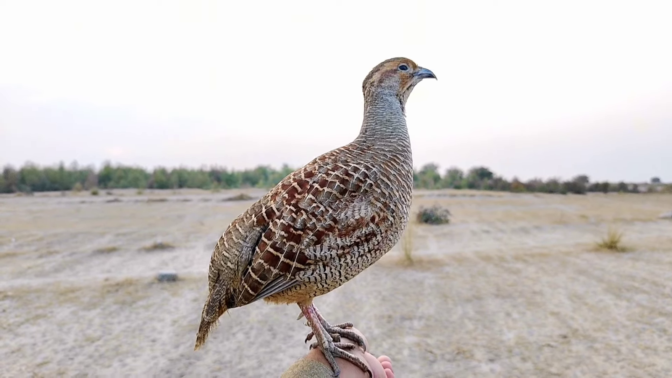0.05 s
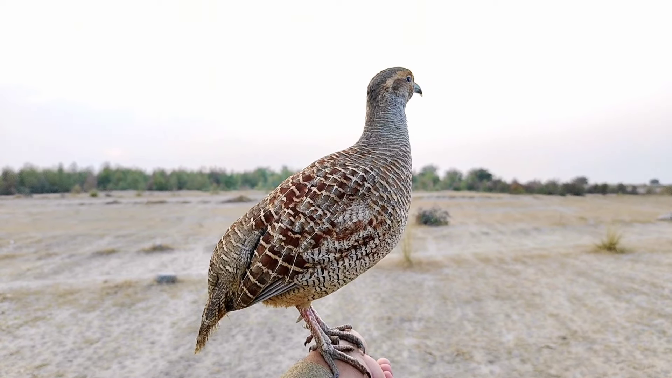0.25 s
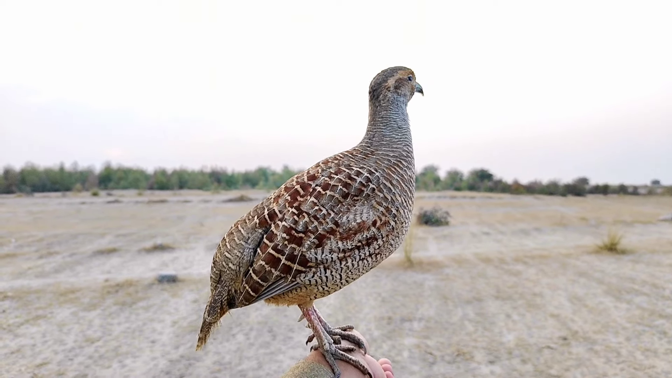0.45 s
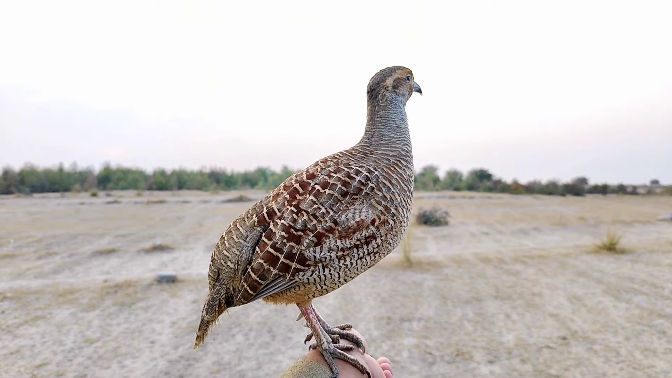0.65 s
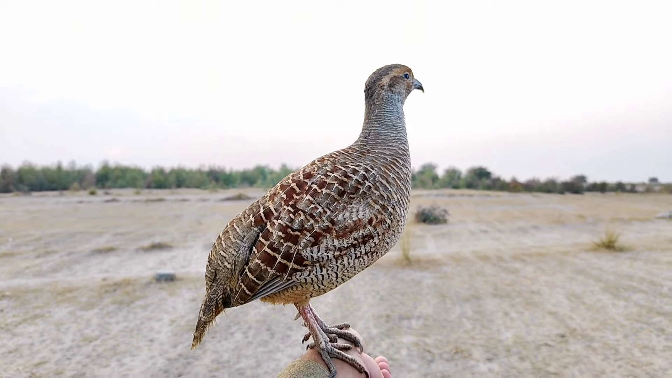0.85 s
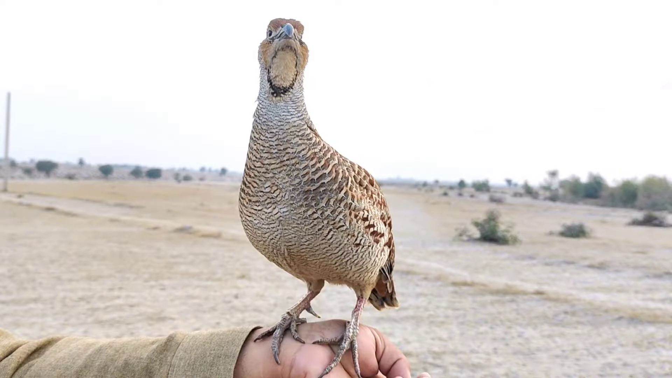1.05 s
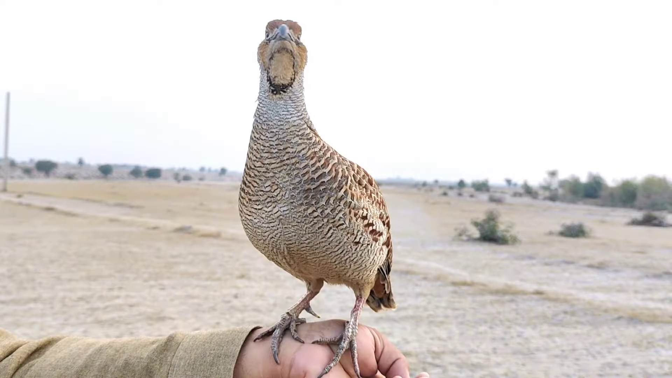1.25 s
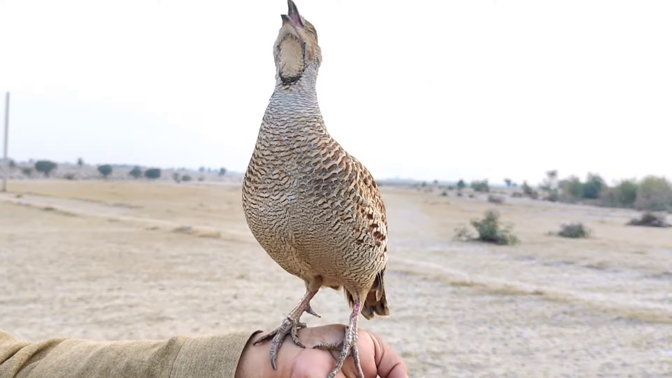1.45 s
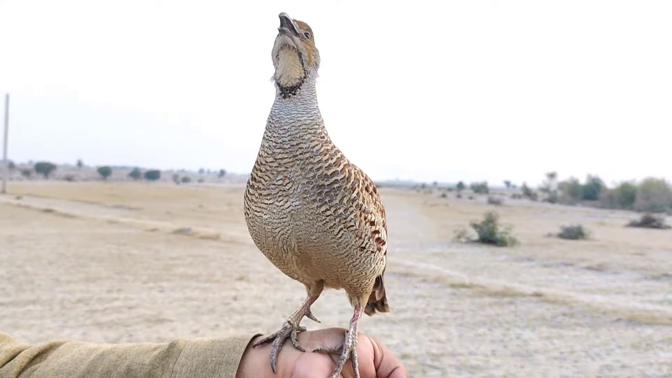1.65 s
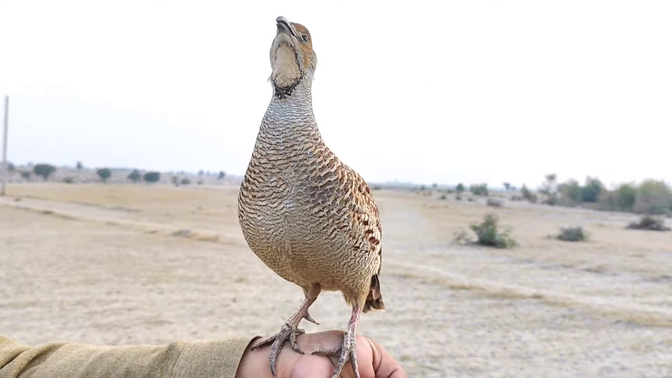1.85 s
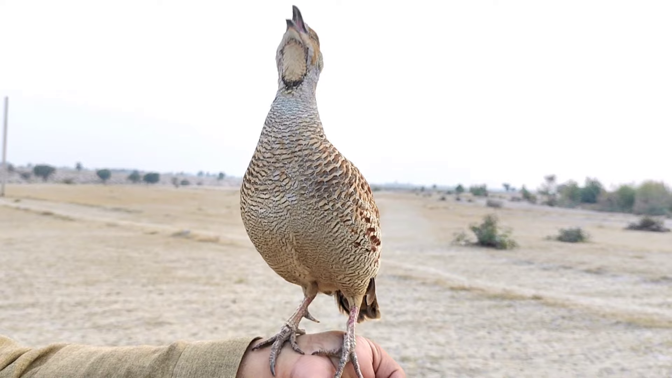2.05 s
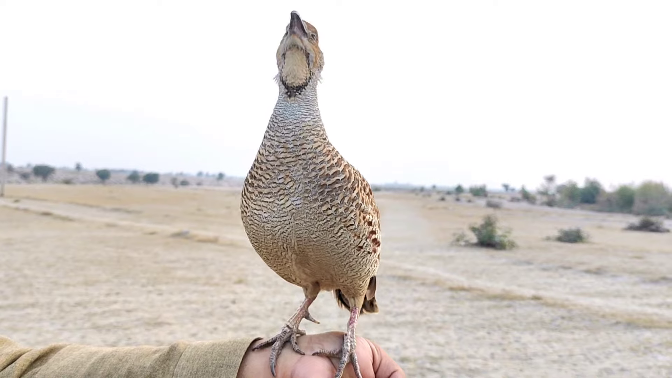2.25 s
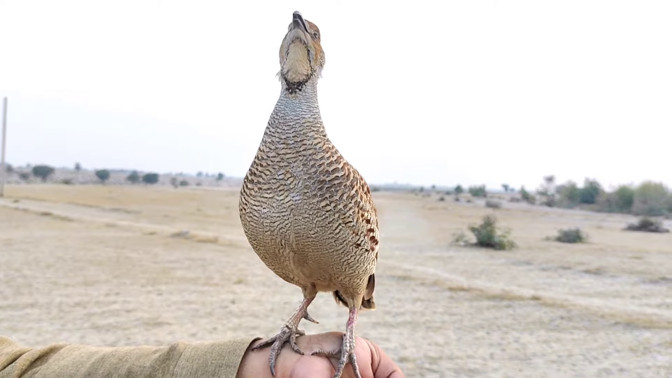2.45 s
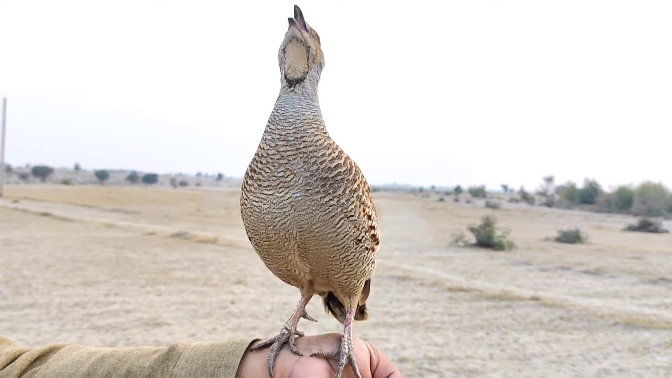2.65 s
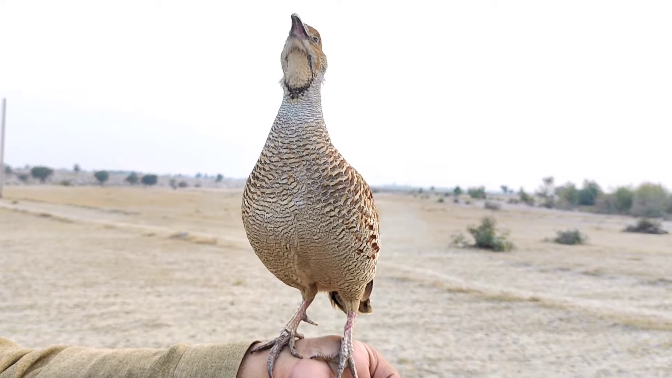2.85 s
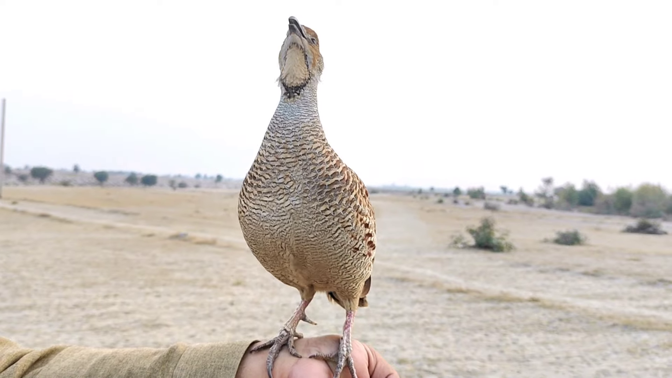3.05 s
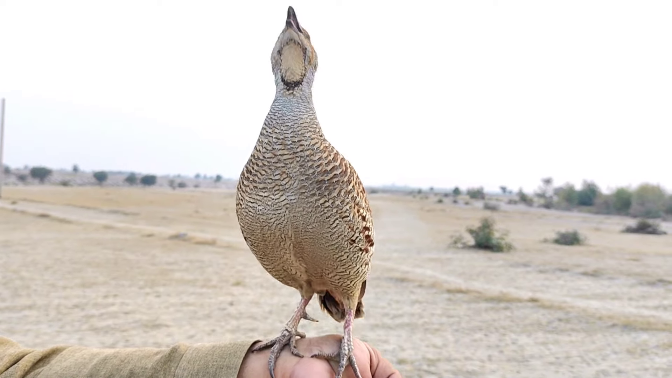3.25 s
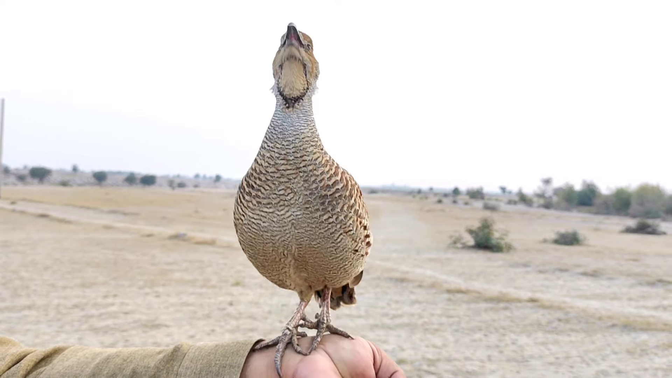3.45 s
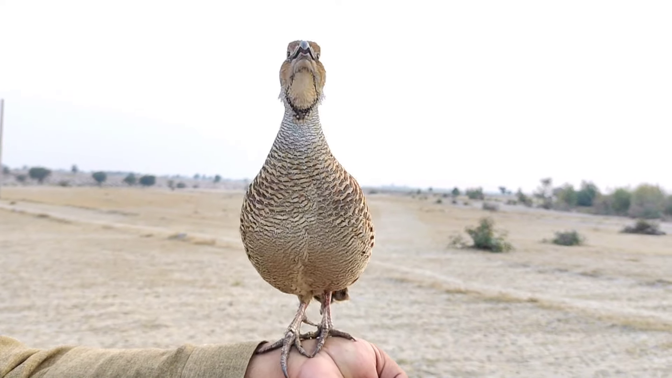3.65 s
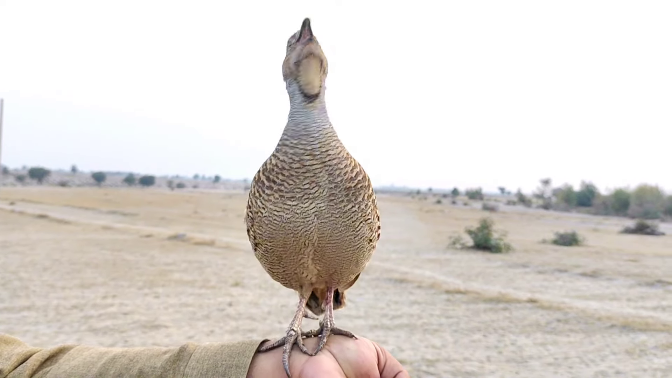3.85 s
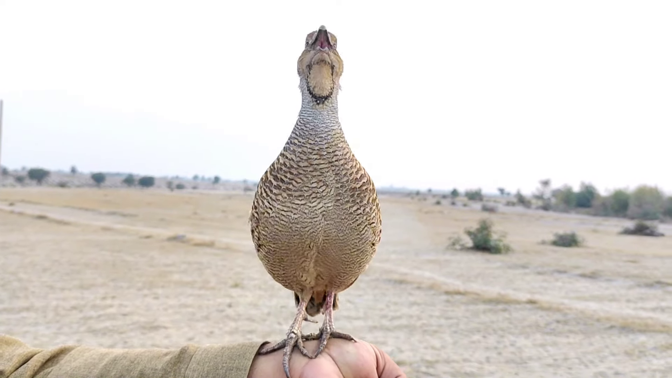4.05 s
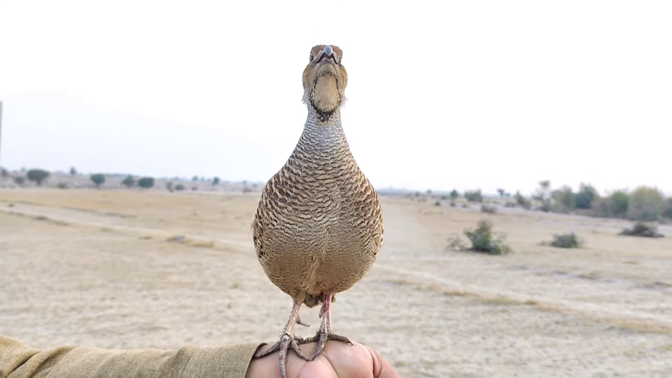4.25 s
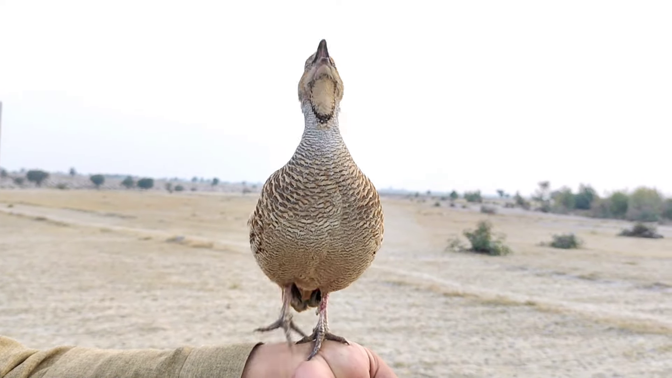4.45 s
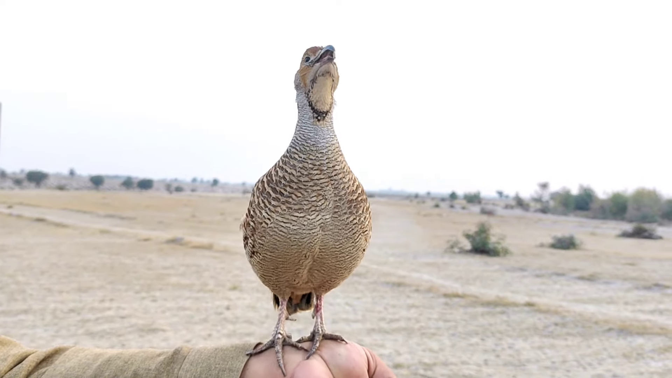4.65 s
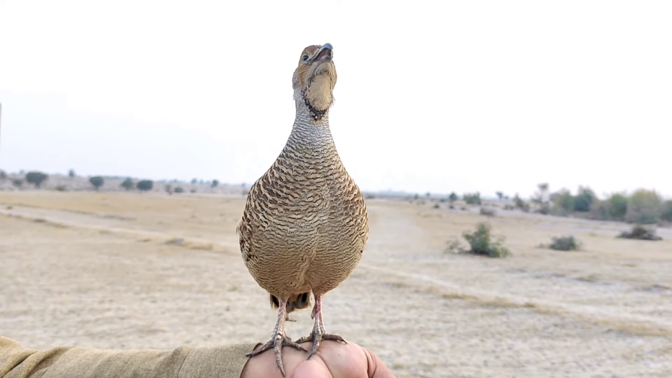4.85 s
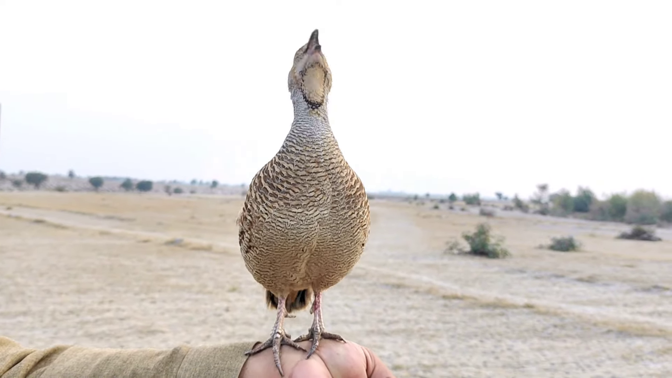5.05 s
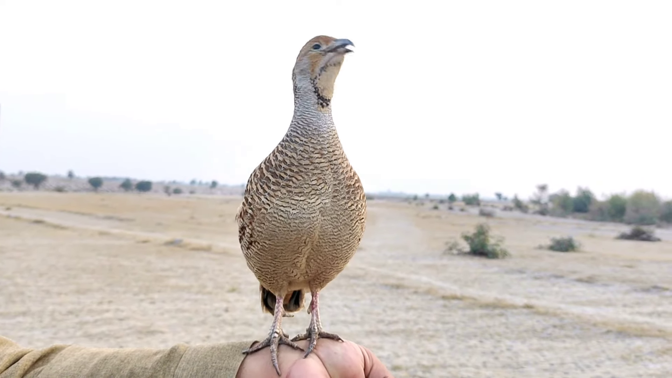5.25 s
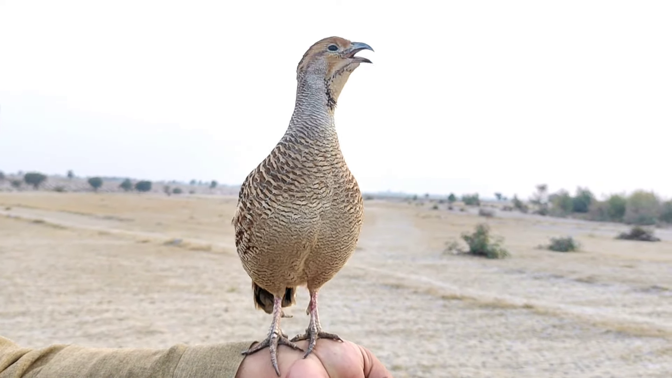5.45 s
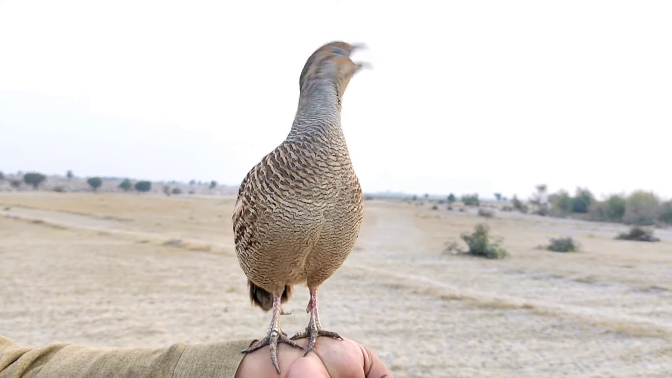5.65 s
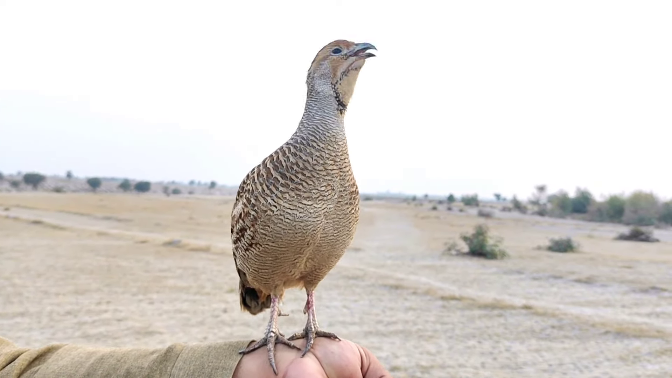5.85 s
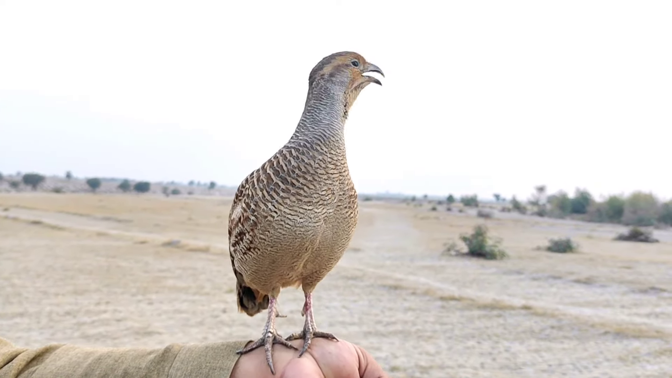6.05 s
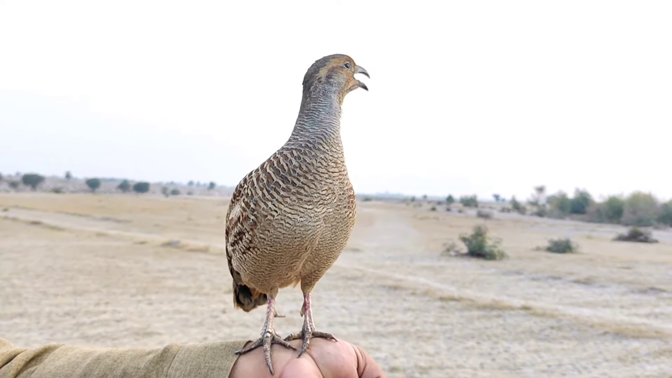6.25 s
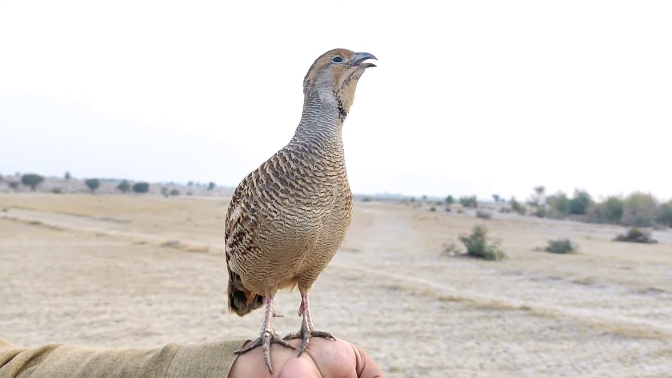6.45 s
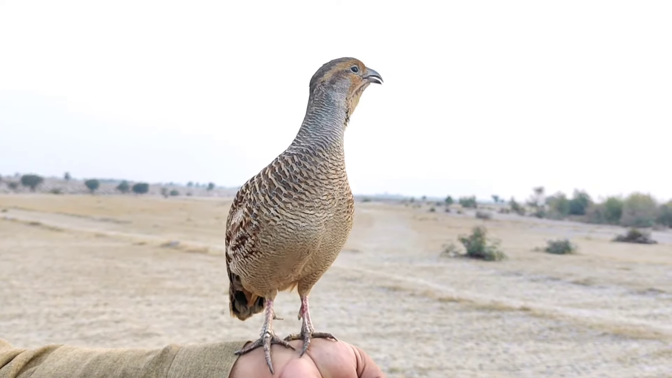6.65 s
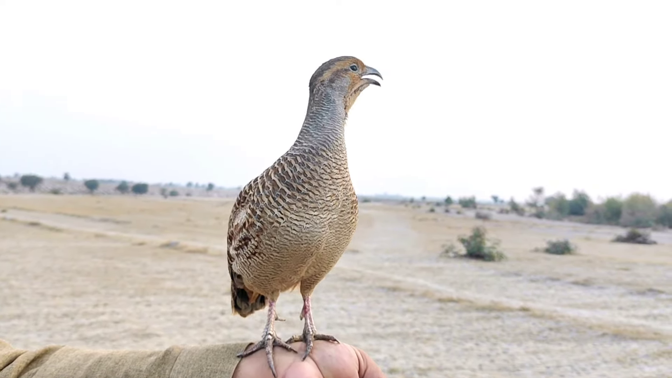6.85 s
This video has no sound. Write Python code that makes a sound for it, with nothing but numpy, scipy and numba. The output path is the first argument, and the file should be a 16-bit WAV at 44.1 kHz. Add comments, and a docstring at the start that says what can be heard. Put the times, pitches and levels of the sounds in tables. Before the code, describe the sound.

A faint, low breeze runs throughout in open fields. Close to the microphone, a francolin gives three soft, sliding chirps at about 0.1, 0.5 and 0.9 seconds. At 1.2 seconds it starts calling loudly with a thin, high, rising whistle, a tiny croak and a shrill piping phrase. From 1.7 seconds the call repeats about every 0.6 seconds with short pauses: two raspy clucks, the rising whistle, then a quick phrase flipping between clean notes and rasps. From about 5.5 seconds a harsh croak replaces the second cluck. The last bout begins at 6.6 seconds and reaches its whistle near 6.9 seconds. A hand makes a few soft, dull bumps on the microphone between 1.1 and 4.5 seconds, well below the calls. The bird sounds close and fairly dry, with only a very faint echo from distant hedges.

```python
"""Flat open fields in a low breeze, with a francolin perched on a hand close to a phone's two microphones.
After a few soft chirps it calls again and again: two clucks, a thin whistle, a piping phrase.
Its voice flips between clean notes, where the membranes swing regularly, and rasps, where they slap shut
and the pulses ring the throat. The hand bumps the phone now and then; far hedges echo the bird."""
import sys
import numpy as np
from scipy import signal
from scipy.fft import rfft, irfft, next_fast_len
from scipy.io import wavfile
from scipy.ndimage import uniform_filter1d, minimum_filter1d
from numba import njit

SR = 44100
rng = np.random.default_rng(int(sys.argv[2]) if len(sys.argv) > 2 else 0)


def pcm_store(signal):
    """Save signal as 16-bit PCM."""
    levels = np.round(np.clip(np.atleast_2d(signal), -1, 1) * 32767)
    wavfile.write(sys.argv[1], SR, levels.astype(np.int16).T)


N = 304286
TOP_HZ = 15700  # upper limit of the phone


def undb(db):
    """Decibels to gain."""
    return 10 ** (np.asarray(db) / 20)


def unit(x):
    """Scale to an RMS of 1."""
    return x / np.sqrt(np.mean(x ** 2))


def on_log(hz, table):
    """Read a curve of (Hz, value) rows along a log frequency axis."""
    freqs, values = np.transpose(table)
    return np.interp(np.log(hz + 1), np.log(freqs + 1), values)


@njit
def bandpass(x, hz, width):
    """State-variable band-pass, gain 1 at the centre."""
    y, band, low = np.empty(len(x)), 0., 0.
    g, damping = np.tan(np.pi * hz / SR), width / hz
    for i in range(len(x)):
        v = (band + g * (x[i] - low)) / (1 + g * (g + damping))
        band, low, y[i] = 2 * v - band, low + 2 * g * v, damping * v
    return y


def ring(x, modes):
    """Steep resonances side by side, alternate in sign."""
    return sum((-1) ** k * undb(db) * bandpass(bandpass(x, float(hz), 1.47 * w), float(hz), 1.47 * w)
               for k, (hz, w, db) in enumerate(modes))


def walk(rate, size=N):
    """Random levels held 1 / rate s and slewed twice; spread near 1."""
    hold = max(int(SR / rate), 1)
    steps = np.repeat(rng.standard_normal(size // hold + 1), hold)
    return 1.4 * uniform_filter1d(uniform_filter1d(steps, hold), hold)[:size]


def arc(n, start, middle, end):
    """A parabola through three values."""
    u = np.linspace(-1, 1, n)
    return middle + (end - start) / 2 * u + ((start + end) / 2 - middle) * u ** 2


def bend(n, start, middle, end):
    """Two straight lines through three values, the corner rounded."""
    lines = np.interp(np.linspace(0, 2, n), [0, 1, 2], [start, middle, end])
    return uniform_filter1d(lines, n // 3 + 1, mode="nearest")


def edges(n, rise_s, fall_s):
    """Gain that opens and closes a sound smoothly."""
    t = np.arange(n) / SR
    return np.sin(np.pi / 2 * np.clip(np.minimum(t / rise_s, t[::-1] / fall_s), 0, 1)) ** 2


def add(out, start_s, x):
    """Mix x into out from start_s on."""
    i = int(start_s * SR)
    out[..., i:i + x.shape[-1]] += x[..., :N - i]


def tone(hz, partials_db, flutter=0., spread=0.):
    """A membrane swinging regularly: partials on one phase; the higher, the more they flutter."""
    phase = 2 * np.pi * np.cumsum(hz) / SR
    shake, offsets = flutter * walk(700, size=len(hz)), spread * rng.standard_normal(60)
    return np.sqrt(2) * sum(undb(db) * (k * hz < TOP_HZ) * np.sin(k * phase + offsets[k] + (k-1) * shake)
                            for k, db in enumerate(partials_db, 1))


# The air over the fields. Each row: frequency in Hz, relative spectral density in dB.
BREEZE_SPECTRUM = [(15, -77), (25, -46), (64, -10), (120, -9), (249, -19), (476, -19.5), (591, -34),
                   (641, -22), (1190, -29.5), (14800, -46), (16000, -43)]
# That air at the two microphones. Each row: frequency in Hz, likeness of left and right from 0 to 1.
BREEZE_LIKENESS = [(60, 0.7), (130, 0.5), (290, .85), (640, 0.7), (1410, 0.7), (3100, 0.1), (6820, 0.07),
                   (15000, 0.09)]


def breeze(level_db=-57):
    """Breeze and far rumble in half-octave bands that swell together and flicker alone."""
    out, swell = 0, walk(2.1)
    for hz in 30 * 2 ** np.arange(0, 9.1, .5):
        mid, side = (unit(bandpass(bandpass(noise, hz, hz / 2), hz, hz / 2))
                     for noise in rng.standard_normal((2, N)))
        like = on_log(hz, BREEZE_LIKENESS)
        band = np.sqrt(1 + like) * mid + np.sqrt(1 - like) * side * np.array([[1], [-1]])
        gust_db = (2 * swell + 3 * walk(6.8)) * min(200 / hz, 1)
        out = out + undb(on_log(hz, BREEZE_SPECTRUM) + 10 * np.log10(hz) + gust_db) * band
    return undb(level_db) * unit(out)


# Hedges far across the fields. Each row: echo delay in seconds, gain of its scatter in dB.
HEDGE_ECHOES = [(0.062, -88), (0.41, -80.5), (0.27, -80)]


def hedges(x):
    """Hand and ground ring out at once; each far hedge returns a dull, smeared copy to each microphone."""
    size, t = next_fast_len(N + SR), np.arange(SR) / SR
    near = undb(-45) * rng.standard_normal((2, SR)) * np.exp(-t / .008)
    # stubble and bushes scatter a faint even tail
    far = undb(-75.5) * rng.standard_normal((2, SR)) * np.exp(-t / .14)
    for delay, db in HEDGE_ECHOES:
        far += undb(db) * rng.standard_normal((2, SR)) * np.exp(-np.abs(t - delay) / .0072)
    dull = bandpass(bandpass(x, 2000., 2400.), 2000., 3200.)
    return irfft(rfft(x, size) * rfft(near, size) + rfft(dull, size) * rfft(far, size), size)[:, :N]


# The phone's microphone ports at close range. Each row: frequency in Hz, lead of the left in radians.
LEFT_LEAD = [(0, -0.5), (1210, -0.84), (2150, -2), (2670, -2.5), (3360, -2), (4480, -5.5), (5340, -4.5),
             (6890, -5), (10300, -12), (10900, -10.5), (13000, -14), (14100, -25), (15100, -16),
             (15800, -15)]
# Their balance. Each row: frequency in Hz, left minus right in dB.
LEFT_BALANCE = [(60, 1), (110, 5.5), (200, 10.5), (380, 0.5), (700, -1), (1290, 1.5), (2380, 1.5),
                (4400, -3.5), (8120, -3), (15000, -2)]


def microphone_ports(x):
    """The two ports hear a close sound with their own lag and colour."""
    size = next_fast_len(N + 4096)
    hz = np.fft.rfftfreq(size, 1 / SR)
    lead = np.interp(hz, *np.transpose(LEFT_LEAD))
    left = undb(on_log(hz, LEFT_BALANCE) / 2) * np.exp(.5j * lead)
    return irfft(rfft(x, size) * np.array([left, 1 / left]), size)[:, :N]


# The hand, right on the phone. Each row: start in seconds, level before the decay in dB.
HAND_BUMPS = [(1.113, -44), (1.148, -52), (1.199, -45), (1.953, -40), (2.634, -37), (3.016, -39.5),
              (3.738, -39), (4.418, -51.5), (4.452, -48.5)]


def hand_bumps():
    """The hand knocks the phone in short, dull scuffs."""
    out, t = np.zeros(N), np.arange(2500) / SR
    for start, db in HAND_BUMPS:
        scuff = bandpass(bandpass(rng.standard_normal(len(t)), 320., 450.), 280., 730.)
        add(out, start, undb(db) * unit(scuff) * np.exp(-t / .02) * edges(len(t), .00092, .003))
    return out


# Soft chirps near the phone before the calls, one list of points a chirp.
# Each row: time in seconds, pitch in Hz, level in dB, second partial in dB against the first.
CHIRP_CURVES = [
    [(.105, 1176, -61, 1), (.125, 850, -55, -5), (.14, 656, -46, -4.5), (.152, 766, -50, -2)],
    [(.535, 1310, -56, -17), (.55, 1380, -49.5, -7), (.58, 915, -57, 0), (.59, 1240, -57, -2),
     (.6, 750, -52, -3.5)],
    [(.908, 1700, -63, 6), (.92, 1940, -59, -5), (.945, 1365, -43, -6), (.955, 1350, -55, -13),
     (.965, 1470, -55, -12)],
]


def chirps():
    """Quiet sliding notes from a closed bill."""
    out = np.zeros(N)
    for points in CHIRP_CURVES:
        times, *columns = np.transpose(points)
        t = np.arange(times[0], times[-1], 1 / SR)
        hz, db, second_db = (np.interp(t, times, column) for column in columns)
        chirp = tone(uniform_filter1d(hz, 300), [0, second_db, second_db - 15.5], flutter=.28)
        add(out, times[0], chirp * undb(db) * edges(len(t), .004, .0036))
    return out


# The whistle, close by. Each row: start and end in seconds, pitch in Hz at start, middle and end,
# level in dB at the same three points, left minus right in dB ahead of the ports.
THIN_WHISTLES = [(1.172, 1.396, 3214, 3480, 3540, -24, -16, -22, -7.5),
                 (1.909, 2.064, 3303, 3410, 3440, -19.5, -20, -20, -8.5),
                 (2.487, 2.652, 3400, 3600, 3560, -15.5, -23, -33, -5),
                 (3.11, 3.267, 3140, 3520, 3690, -29.5, -18.5, -26.5, 0),
                 (3.721, 3.882, 3440, 3510, 3820, -33, -23.5, -23.5, -1),
                 (4.34, 4.482, 3320, 3600, 3710, -32, -26.5, -16, -3),
                 (4.96, 5.119, 3480, 3605, 3660, -30, -25, -19.5, -3.5),
                 (5.581, 5.736, 3436, 3530, 3810, -25.5, -25, -22.5, -2.5),
                 (6.189, 6.344, 3466, 3540, 3700, -22, -28.5, -18.5, -0.5),
                 (6.808, 6.896, 3475, 3650, 3730, -36.5, -23, -20, -2.5)]
# The throat behind it. Each row: resonance in Hz, width in Hz, relative level in dB.
HISS_MODES = [(1900, 590, 2), (3100, 610, 5), (4350, 710, 1.5), (7000, 630, -26), (9500, 1200, -18.5)]


def whistles(linger_s=.033):
    """A thin rising whistle that fades under the next sound; its air hisses through the throat."""
    out, linger = np.zeros((2, N)), int(linger_s * SR)
    for start, end, hz0, hz1, hz2, db0, db1, db2, pan_db in THIN_WHISTLES:
        n = int((end - start) * SR)
        hz = np.pad(arc(n, hz0, hz1, hz2) * (1 + .002 * walk(180, size=n)), (0, linger), "edge")
        db = np.pad(bend(n, db0, db1, db2), (0, linger), "edge")
        n += linger
        sides_db = np.array([[pan_db], [-pan_db]]) / 2
        pipe = tone(hz, [0, -44], flutter=1.) * undb(db + walk(90, size=n) + sides_db)
        # the hiss keeps up while the tone is still weak
        air = unit(ring(rng.standard_normal(n), HISS_MODES)) * undb(.5 * db - 32.5)
        add(out, start, pipe * edges(n, .028, linger_s) + air * edges(n, .012, linger_s))
    return out * edges(N, .004, .004)


SLACK_HZ, RATE_BOW_HZ = 278.8, 15  # pulse rate of the first slaps; mid-glide lead over an even slope
# Croaks, close by. Each row: start and end in seconds, pulse rate at the turn in Hz,
# level at the turn in dB, treble in dB.
CROAK_CALLS = [(1.397, 1.411, 258, -23.5, -20), (1.86, 1.886, 330, -11.5, -12),
               (5.524, 5.59, 505, -6.5, -14), (6.125, 6.192, 499.5, -7.5, -17.5),
               (6.753, 6.82, 477, -8.5, -20.5)]


def croaks(end_share=.7, start_db=-9, end_db=-19):
    """Syllables of the croaks: rasps that swell and sink back without a note."""
    for start, end, hz, db, treble_db in CROAK_CALLS:
        turn, low_hz = (start + end) / 2, end_share * hz
        yield ("rasp", start, turn, SLACK_HZ, (SLACK_HZ + hz) / 2 + 2 * RATE_BOW_HZ, hz,
               db + start_db, db + start_db / 2, db, treble_db)
        yield ("closing", turn, end, hz, (hz + low_hz) / 2 + RATE_BOW_HZ, low_hz,
               db, db + end_db / 4, db + end_db, treble_db - 2.5)


# Clucks, close by. Each row: start, flip and middle of the dying rasp in seconds,
# pulse rate at the flip in Hz, note pitch in Hz, then rasp level, note level and treble in dB.
CLUCK_CALLS = [(1.718, 1.754, 1.782, 426, 1255, -10, -5, -8.5),
               (1.876, 1.894, 1.921, 490, 1226, -14.5, -6, -7.5),
               (2.315, 2.348, 2.381, 544, 1380, -10, -7, -4),
               (2.458, 2.499, 2.521, 438, 1300, -9.5, -5.5, -6),
               (2.915, 2.938, 2.978, 556, 1457, -11.5, -7, -2),
               (3.056, 3.095, 3.123, 561, 1354, -11, -7, -6),
               (3.512, 3.535, 3.571, 627.5, 1464, -10.5, -5.5, -3),
               (3.651, 3.685, 3.717, 566, 1381, -10, -7, -5.5),
               (4.128, 4.156, 4.190, 641.6, 1429, -11.5, -6.5, -3),
               (4.263, 4.300, 4.326, 496.5, 1353, -9, -6, -6.5),
               (4.762, 4.791, 4.825, 577.6, 1392, -10.5, -6.5, -5),
               (4.9, 4.949, 4.957, 471.5, 1324, -8.5, 4, -7.5),
               (5.382, 5.416, 5.449, 537, 1384, -9.5, -6.5, -8),
               (5.987, 6.013, 6.047, 535, 1388, -9.5, -4.5, -9),
               (6.613, 6.643, 6.675, 498, 1373, -10, -6, -11.5)]


def clucks(sag_hz_per_s=11000, soften_db_per_s=199, tail_s=.011):
    """Syllables of the clucks: a quickening rasp flips into a sagging note and dies in a short rasp."""
    tail_hz, tail_db = (436.7, 404, 330), np.array([-14.5, -15.5, -18])
    for start, flip, fade, rate_hz, hz, rasp_db, db, treble_db in CLUCK_CALLS:
        yield ("rasp", start, flip, SLACK_HZ, (SLACK_HZ + rate_hz) / 2 + RATE_BOW_HZ, rate_hz,
               rasp_db - 6.5, rasp_db, rasp_db - 1, treble_db)
        end = fade - tail_s / 2
        sag = sag_hz_per_s * (end - flip) / 2
        onset_db = db + 2.5 - soften_db_per_s * (end - flip)  # long notes start softer
        yield "note", flip, end, hz + sag, hz - 14, hz - sag, onset_db, db, db - 5.5, treble_db - 19.5
        yield "closing", end, end + tail_s, *tail_hz, *(db + tail_db), treble_db - 15.5


HELD_HZ = 1938  # the steady note, before each phrase's pitch ratio
# The piping phrase, short and full, syllable by syllable. Each row: voice, pitch in Hz at start, middle
# and end, level in dB at the same three points, treble in dB, pause after it in seconds.
SHORT_FORM = [("rasp", 980, 930, 900, -12.5, -11.5, -13, 4.3, 0.0025),
              ("note", HELD_HZ, HELD_HZ, HELD_HZ, -18.5, -11.5, -16, 1.1, 0),
              ("rasp", 1700, 1300, 460, -16, -19, -14.5, 3.6, 0),
              ("note", HELD_HZ, HELD_HZ, HELD_HZ, -16.5, -15, -15.5, -1.5, .002),
              ("note", 1900, 1600, 1400, -15.5, -11, -13, -15.5, .004),
              ("closing", 570, 480, 380, -16.5, -26.5, -39.5, -24, 0)]
FULL_FORM = [("rasp", 270, 350, 350, -19.5, -14.5, -14, 3, 0),
             ("note", 1400, 1750, 1480, -18, -11.5, -22.5, -2.9, 0),
             ("rasp", 1600, 960, 1500, -11.5, -10.5, -18.5, 10.7, 0.00083),
             ("note", HELD_HZ, HELD_HZ, HELD_HZ, -14, -11, -13, -3.5, 0),
             ("note", 2300, 2400, 2415, -11.5, -11, -10.5, -5.5, 0),
             ("rasp", 1900, 930, 970, -19.5, -13.5, -18.5, 16, 0.0022),
             ("note", 1990, 1880, 1790, -9.5, -11, -10, -8, 0),
             ("note", 2226, 2196, 1940, -13, -15.5, -24.5, -4, 0),
             ("note", 1600, 1440, 1395, -13, -10.5, -21, -26, 0.0023),
             ("closing", 468, 560, 440, -21.5, -32.5, -31, -14, 0)]
# One such row: where the voice does not jump, this long note replaces the fourth and fifth syllables.
LONG_NOTE = ("note", 1915, 1945, 1805, -11.5, -6.5, -14.5, -6, 0)
# The phrases, close to the phone. Each row: syllable starts and the final end in seconds,
# pitch ratio, level offset in dB, treble offset in dB.
PHRASE_CALLS = [((1.464, 1.503, 1.534, 1.552, 1.565, 1.611, 1.629), 0.95, -.3, -1.5),
                ((2.062, 2.103, 2.133, 2.152, 2.166, 2.215, 2.223), 0.98, 0.22, 0.66),
                ((2.658, 2.664, 2.675, 2.698, 2.733, 2.751, 2.781, 2.802, 2.812, 2.823), 0.98, -.5, 2),
                ((3.253, 3.260, 3.272, 3.292, 3.311, 3.324, 3.343, 3.374, 3.396, 3.408, 3.419),
                1.005, -1.1, 1.5),
                ((3.868, 3.874, 3.885, 3.908, 3.923, 3.942, 3.958, 3.988, 4.012, 4.023, 4.032),
                1.01, -0.77, .7),
                ((4.498, 4.507, 4.519, 4.540, 4.557, 4.576, 4.589, 4.616, 4.642, 4.655, 4.666),
                1.015, 0.48, -0.9),
                ((5.117, 5.124, 5.137, 5.156, 5.181, 5.191, 5.211, 5.232, 5.264, 5.274, 5.284),
                1.01, 0.31, 0.16), ((5.728, 5.738, 5.745, 5.763, 5.806, 5.824, 5.846, 5.869, 5.883, 5.896),
                .98, 1.36, -4), ((6.347, 6.352, 6.366, 6.384, 6.425, 6.438, 6.463, 6.489, 6.506, 6.519),
                .98, 1.84, -4.5)]


def phrases():
    """Syllables of the phrases, each phrase at its own pace, pitch, level and brightness."""
    unbroken = FULL_FORM[:3] + [LONG_NOTE] + FULL_FORM[5:]
    form_by_count = {len(form): form for form in (SHORT_FORM, unbroken, FULL_FORM)}
    for times, ratio, db, treble_db in PHRASE_CALLS:
        form = form_by_count[len(times) - 1]
        for start, stop, (voice, *shape, treble, pause) in zip(times, times[1:], form):
            hz, level = np.reshape(shape, (2, 3))
            yield voice, start, stop - pause, *(ratio * hz), *(level + db), treble + treble_db


def syllables(voice):
    """One voice's rows: start and end in seconds, three pitches in Hz, three levels and treble in dB."""
    return [row[1:] for row in (*clucks(), *croaks(), *phrases()) if row[0] == voice]


# The bird's throat, low and high. Each row: resonance in Hz, width in Hz, relative level in dB.
LOW_MODES = [(850, 880, -14.5), (1546, 387, 4), (2194, 240, 0)]
HIGH_MODES = [(2622, 462, 8), (3878, 570, 0.5), (5097, 514, -1.5), (7200, 3000, -25.5), (11070, 750, -21.5),
              (13500, 2000, -32.5)]


def rasps(closing_ratio=.88, closing_sides_db=-8.5):
    """The membranes slap shut a little unevenly; each slap and its puff of air ring the throat."""
    out = np.zeros(N)
    # as the bill closes the throat rings lower and its middle resonance stands out
    closing_modes = [(closing_ratio * hz, width, db + (k != 1) * closing_sides_db)
                     for k, (hz, width, db) in enumerate(LOW_MODES)]
    for voice, throat in ("rasp", LOW_MODES), ("closing", closing_modes):
        for start, end, hz0, hz1, hz2, db0, db1, db2, treble_db in syllables(voice):
            n = int((end - start + .00622) * SR)
            hz = arc(n, hz0, hz1, hz2).clip(150, 2000) * (1 + .032 * walk(hz1, size=n))
            db = bend(n, db0, db1, db2)
            # the partial nearest the windpipe's resonance is pulled up and sings through the rasp
            partials = np.arange(1, int(7000 / max(hz1, 200)) + 1)
            sung = partials == max(round(throat[1][0] / hz1), 1)
            # a slap is drawn out, not a click: its partials lie apart in phase
            slaps = unit(tone(hz, 4. * sung, flutter=.05, spread=.8)) * undb(2.2 * walk(hz1, size=n))
            puff = .5 * rng.standard_normal(n)
            # the treble swells and fades faster than the effort
            treble_gain = undb(treble_db + .95 * (db - db1)) * edges(n, .0038, .004)
            treble = treble_gain * unit(ring(slaps + 3.5 * puff, HIGH_MODES))
            rasp = (unit(ring(slaps + puff, throat)) + treble) / np.hypot(1, undb(treble_db))
            add(out, start - .002, rasp * undb(db) * edges(n, .0009, .0091))
    return out


# How the open bill passes a note's upper partials. Each row: frequency in Hz, relative gain in dB.
OPEN_BILL = [(2500, 3.5), (3800, 3), (5200, -1), (5800, -20), (6600, -23.5), (7600, -23), (8800, -29),
             (10500, -29), (15000, -44.5)]


def notes():
    """Clean piping with a little air hissing through the throat; treble sets the second partial."""
    out = np.zeros(N)
    for start, end, hz0, hz1, hz2, db0, db1, db2, treble_db in syllables("note"):
        n = int((end - start + .0027) * SR)
        hz = arc(n, hz0, hz1, hz2) * (1 + .003 * walk(300, size=n))
        upper_db = [treble_db + on_log(k * hz, OPEN_BILL) - on_log(2 * hz1, OPEN_BILL)
                    for k in range(2, 9)]
        air = undb(-25.5) * unit(ring(rng.standard_normal(n), LOW_MODES + HIGH_MODES))
        note = tone(hz, [0, *upper_db], flutter=.32) + air
        add(out, start - .0015, note * undb(bend(n, db0, db1, db2)) * edges(n, .0018, .0028))
    return out


# Bands that the bill lets out weakly. Each row: centre in Hz, width in Hz, gain at the centre in dB.
BILL_NOTCHES = [(6124, 480, -23), (8600, 120, -22)]


def bill(x):
    """Side cavities darken two treble bands."""
    for hz, width, db in BILL_NOTCHES:
        x = x - (1 - undb(db)) * bandpass(x, float(hz), float(width))
    return x


def scene():
    """Bird and hand right at the microphones, hedges and breeze far behind."""
    voice, whistle = bill(notes() + rasps() + chirps()), whistles()
    close = microphone_ports(voice + whistle + hand_bumps())
    return close + hedges(voice + whistle.mean(axis=0)) + breeze()


def record(dry):
    """The phone cuts the deep bass and the top; its limiter pulls the gain down around loud peaks."""
    dry = signal.sosfilt(signal.butter(2, 58, "high", fs=SR, output="sos"), dry)
    safe_gain = np.minimum(.88 / (np.abs(dry).max(axis=0) + 1e-9), 1)
    gain = uniform_filter1d(minimum_filter1d(safe_gain, size=129), size=128)
    return signal.sosfilt(signal.ellip(8, .2, 70, TOP_HZ, fs=SR, output="sos"), gain * dry)


dry = scene()
out = record(dry)
pcm_store(out)
```